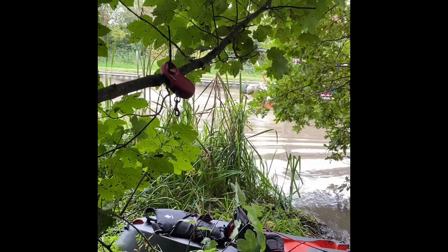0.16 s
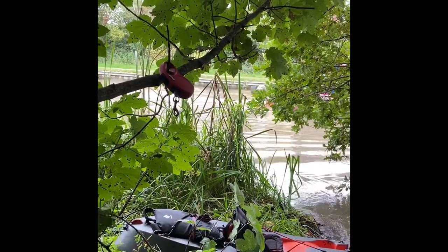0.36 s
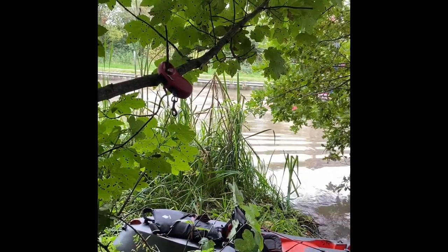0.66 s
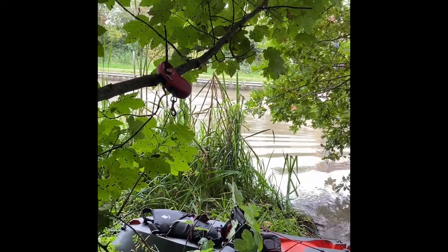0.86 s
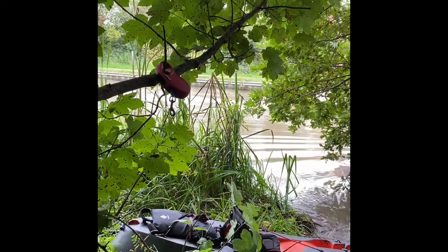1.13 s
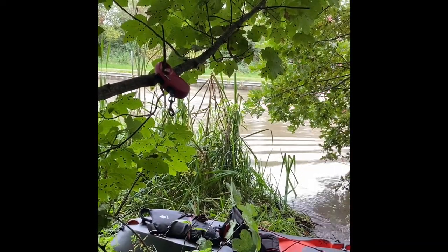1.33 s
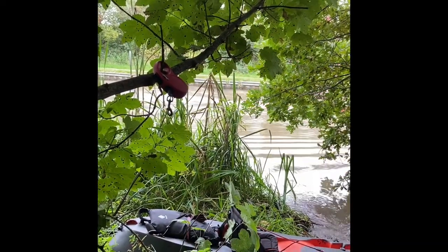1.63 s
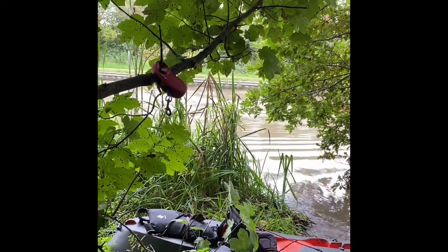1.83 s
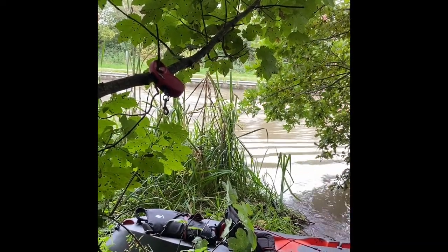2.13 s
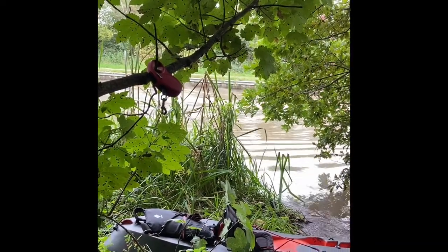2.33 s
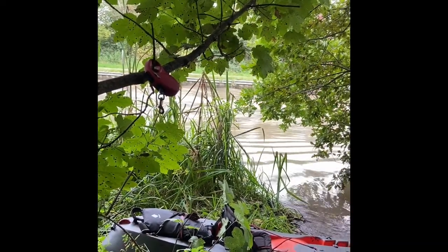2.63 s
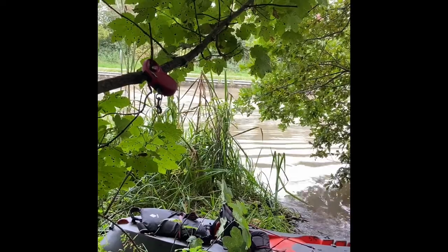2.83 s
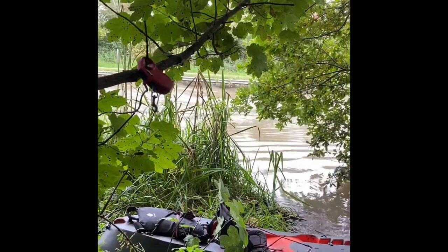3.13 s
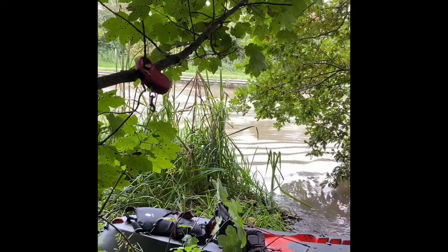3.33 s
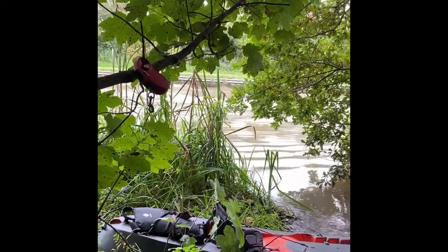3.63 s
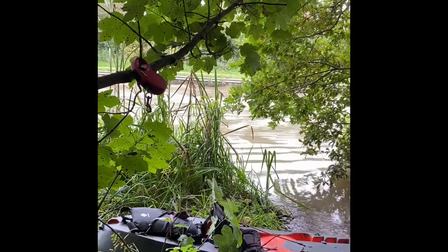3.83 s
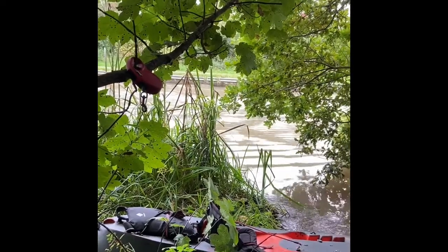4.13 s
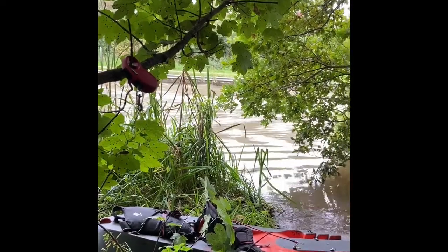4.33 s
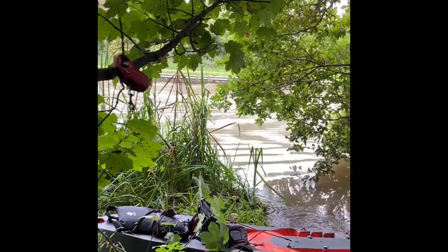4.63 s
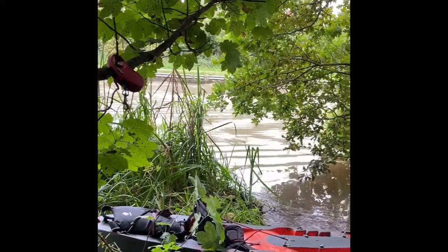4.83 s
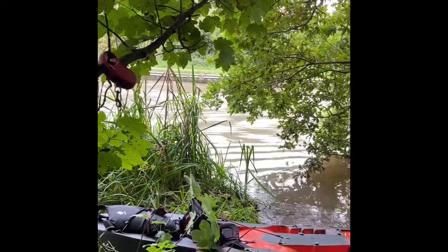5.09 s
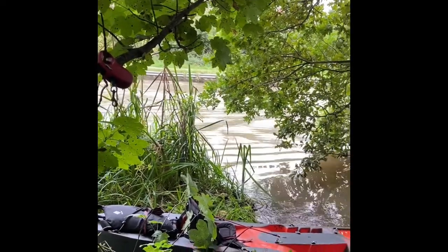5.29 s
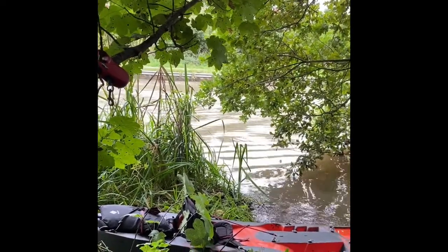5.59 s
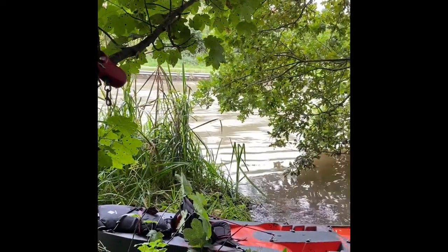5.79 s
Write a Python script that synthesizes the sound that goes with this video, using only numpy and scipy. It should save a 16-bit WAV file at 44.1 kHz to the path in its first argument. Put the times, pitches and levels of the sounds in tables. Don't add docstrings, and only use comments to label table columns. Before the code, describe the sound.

From a leafy canal bank, a slow diesel boat close by chugs in quick, uneven pairs of beats, between six and seven pairs a second. Each blow booms low, clangs hollowly and spits a short whistling hiss. It gradually gets quieter as it leaves. A thin bird chip sounds once near the start, over a soft watery hush. Stereo phone pickup.

```python
import sys
import numpy as np
from scipy import signal
from scipy.fft import rfft, irfft
from scipy.io import wavfile
from scipy.ndimage import uniform_filter1d, map_coordinates

SR = 44100
rng = np.random.default_rng(int(sys.argv[2]) if len(sys.argv) > 2 else 0)


def store_wav(level_fs):
    pcm = np.round(np.clip(np.atleast_2d(level_fs), -1, 1) * 32767)
    wavfile.write(sys.argv[1], SR, pcm.T.astype(np.int16))


def decibels_to_gain(level_db):
    exponent = np.asarray(level_db, float) / 20
    return 10 ** exponent


N = 262395
TIME = np.arange(N) / SR
FREQ = np.fft.rfftfreq(N, 1 / SR)

# (t/s, engine cycles done)
CRANK = [(-0.953, -7), (0.09, 0), (0.6862, 4), (1.5792, 10), (2.4716, 16), (3.3645, 22), (4.7052, 31),
         (5.0036, 33), (5.8974, 39)]
# (t/s, level against mid-way/dB)
NEAR = [
    (0, 2),
    (1, 1.63),
    (2, 1.56),
    (3, 0),
    (4.2, -1),
    (5, -1.5),
    (5.95, -3),
]


def boom():
    # (f/Hz, signed amplitude, time to fall 60 dB/s)
    pipe = [(46.9, 0.304, 0.546), (64.4, -0.609, 0.071), (87.0, -0.217, 0.147), (93.8, 0.417, 0.072),
            (129.3, -0.13, 0.134), (156.2, 0.153, 0.14), (191.2, 0.013, 0.458), (236.6, 0.01, 0.55),
            (301.3, -0.009, 0.211), (375.6, 0.015, 0.06)]
    # (f/Hz, signed amplitude, time to fall 60 dB/s)
    hull = [(47.8, 0.279, 0.55), (62.7, -0.156, 0.219), (73.8, -0.194, 0.145), (93.7, -0.032, 0.55),
            (120.4, -0.084, 0.365), (163.4, 0.515, 0.061), (174.2, -0.29, 0.121), (248.4, 0.023, 0.065),
            (253.9, -0.03, 0.313), (306.7, -0.006, 0.55)]
    cylinder_gap_s = .0372
    s, cycles = np.transpose(CRANK)
    starts = np.interp(np.arange(cycles[0], cycles[-1] + 1), cycles, s) + 1
    # under 60 Hz, 60-190 Hz, above
    fade = [share * curve(NEAR, 1) for share in (1, 0.26, 1)]
    out = np.zeros(N + SR)
    for modes, lag_s, second_share in ((pipe, .0146, .9495), (hull, .0237, .3123)):
        blows = np.zeros(N + 2 * SR)
        blows[((starts + lag_s) * SR).astype(int)] = 1
        blows[((starts + lag_s + cylinder_gap_s) * SR).astype(int)] = second_share
        for hz, gain, t60 in modes:
            db = fade[np.searchsorted([60, 190], hz)]
            level_db = np.pad(db, (SR, 0), "edge") - db[N // 2]
            out += gain * ring(blows[:N + SR], hz, t60) * decibels_to_gain(level_db)
    return signal.sosfilt(signal.butter(4, 35.7, "high", fs=SR, output="sos"), out)[SR:]


def strokes(lag_s, start_db, fall, high_column):
    # (t/s, low f/Hz, high f of first cylinder/Hz, high f of second cylinder/Hz)
    whistles = [(0, 1369, 2400, 2430), (1, 1310, 2300, 2300), (1.6, 1710, 2310, 2330),
                (2.6, 1530, 2400, 2550), (3.1, 1990, 2194, 2530), (3.7, 1867, 2580, 2600),
                (4.2, 1876, 2470, 2620), (4.7, 1800, 2140, 2320), (5.15, 2005, 2130, 2620),
                (5.45, 2132, 2190, 2520), (5.95, 2106, 2260, 2630)]
    # (t/s, then change of clang/dB, low whistle/dB, high whistle/dB)
    uneven = [(.099, 0.5, 2, -12), (.397, 3.7, -10, 0.5), (.434, 2.5, 0, 0), (.583, 5, -3, -0.5),
              (.695, 3.5, 0.5, 0), (.881, 4, -14, 3), (1.03, -6, 4, 3.5), (1.179, -18, -21, 3),
              (1.291, 0.5, 0, 1.5), (1.328, -7, -5, 0.5), (1.625, -25, -6, 1.5), (1.923, -3, 1, 3.5),
              (2.518, -1.5, 3, 4), (2.63, -0.5, -9, 2.5), (2.667, -2, -0.5, 1.5), (2.778, 0, -3, 5),
              (2.815, 4.5, 0, -2), (2.927, 0, 1.5, 2.5), (3.076, -0.5, 5, -4), (3.262, -38, 3, 2.5),
              (3.374, -1.5, -9, -1), (3.709, 1.5, 7, -1), (3.857, -1.5, 5, 0), (4.267, 0, 5.5, -15),
              (4.453, 0.5, 4.5, 2), (4.863, -2.5, -10, 0.5), (5.199, 4.5, -3, 0.3), (5.459, -2, 3, -1),
              (5.757, -1.5, -11, 0), (5.943, 2, 0, -1)]
    s, cycles = np.transpose(CRANK)
    times = np.interp(np.arange(-1, cycles[-1] + 1), cycles, s) + lag_s
    at = (times * SR).astype(int).clip(0)
    chance = rng.standard_normal((len(times), 5))
    db = np.array(start_db) + np.outer(curve(NEAR, 1)[at], fall)
    change_db = 1.5 * chance[:, :3]
    for when, *extra_db in uneven:
        change_db[np.abs(times - when) < .015] = extra_db
    clang, low, high = (db + change_db).T
    low_hz = curve(whistles, 1)[at] * (1 + .04 * chance[:, 3])
    high_hz = curve(whistles, high_column)[at] * (1 + .04 * chance[:, 4])
    return np.transpose([times, clang, low_hz, low, high_hz, high])


def puffs(events, knock, rise_s, hold_s, fall_s, clang_db, whistle_db, jet_db, whistle_t60, ragged_db,
          ping_db, rumble_db, lead_s, plate_db):
    # (f/Hz, level per Hz/dB)
    jet_colour = [(500, 1), (1000, 2.5), (2000, 3), (2800, 2), (3300, -4.5), (4200, -17), (5000, -11),
                  (5600, -14.5), (6500, -13.5), (8300, -18.5), (12000, -29.5), (15000, -39), (16500, -84)]
    # (f/Hz, time to fall 60 dB/s, share near, share far)
    outlet = [(536, 0.21, 0.058, 0.026), (703, 0.048, 0.86, 0.13), (767, 0.033, 0.57, 0.6),
              (870, 0.026, 0.066, 1), (1020, 0.018, 0.017, 0.47), (464, 0.095, 0.16, 0.13)]
    out, rumble = np.zeros(N), np.zeros(N)
    hiss = ragged(jet_colour, ragged_db)
    t = np.arange(SR // 12) / SR
    after = np.maximum(t - rise_s - hold_s, 0)
    shut = 0.43 * np.exp(-after / fall_s) + 0.84 * np.exp(-after / 0.018)
    gate = np.minimum(t / rise_s, 1) ** 2 * shut
    for s, db, low_hz, low_db, high_hz, high_db in events:
        gas = rng.standard_normal((5, len(t))) * gate
        far = s * SR / N
        push = 0.057 * gas[0]
        push[[0, int(SR / outlet[1][0])]] += knock
        clang = 0
        for hz, t60, near, away in outlet:
            clang = clang + (near + (away - near) * far) * ring(push, hz, t60)
        add(out, s, unit(clang) * decibels_to_gain(db + clang_db))
        for rush, hz, level_db in ((gas[1], low_hz, low_db), (gas[2], high_hz, high_db)):
            tone = np.cos(2 * np.pi * hz * t + rng.uniform(0, 2 * np.pi))
            drive = (rush + 0.37 * gate * tone) * gate
            add(out, s - lead_s, unit(ring(drive, hz, whistle_t60)) * decibels_to_gain(level_db + whistle_db))
        ping = unit(ring(gas[3], 5050 * (1 + .025 * gas[4, 200]), .012))
        add(out, s + 0.0016, ping * decibels_to_gain(high_db + ping_db - 8.1 * far))
        plate = unit(ring(gas[4] * gate, rng.uniform(2900, 4500), .012))
        add(out, s + 0.001015, plate * decibels_to_gain(db / 2 + plate_db))
        swell = (t / 0.011) * np.exp(1 - t / 0.0089)
        add(rumble, s + 0.017, swell * decibels_to_gain(rumble_db - 0.9 * far))
        i = max(int(s * SR), 0)
        jet = unit(gate[:N - i] * hiss[i:i + len(t)])
        add(out, s, jet * decibels_to_gain(0.61 * max(low_db, high_db) + jet_db - 1.17 * far))
    return band(out, 500, 22000) + rumble * unit(band(rng.standard_normal(N), 190, 412))


def ragged(points, depth_db):
    spectrum = rfft(coloured(points))
    octave = np.round(np.log2((FREQ + 1) / 700)).clip(0, 4)
    out = np.zeros(N)
    for k in range(5):
        spurts_db = depth_db * (1 - 0.13 * k) * walk(350)
        out += irfft(spectrum * (octave == k), N) * decibels_to_gain(spurts_db)
    return out


def water(x):
    # (t/s, first dip f/Hz, share)
    mirror = [(0, 1020, 0.25), (1.5, 1024, 0.26), (3, 1164, 0.078), (4.5, 1385, 0.06), (5.95, 1700, 0.1)]
    late = np.arange(N) - SR / curve(mirror, 1)
    return x - curve(mirror, 2) * map_coordinates(x, [late], order=3)


def trees(x, t60_low, t60_high):
    t = np.arange(SR) / SR
    noise = rng.standard_normal((2, SR)) * np.minimum(t / 0.0014, 1)
    low = signal.sosfilt(signal.butter(2, 1800, fs=SR, output="sos"), noise)
    tail = low * decibels_to_gain(-60 * t / t60_low) + (noise - low) * decibels_to_gain(-60 * t / t60_high)
    leaves = rng.standard_normal(SR) * decibels_to_gain(-60 * t / 0.025)
    side = 0.17 * band(tail[1], 590, 5600) + 5.4 * band(leaves, 1890, 5300)
    pair = spread(tail[0], side)
    return signal.fftconvolve(x[None], pair / np.sqrt(SR / 20), axes=1)[:, :N]


def bird():
    # (t/s, f/Hz, level/dB)
    chip = [
        (.718, 8330, -66),
        (.73, 8320, -51),
        (.745, 8260, -56),
        (.76, 8300, -47),
        (.778, 8250, -50),
        (.787, 8230, -58),
        (.84, 8260, -66),
    ]
    hz = curve(chip, 1) * (1 + 0.0046 * walk(260))
    sounding = (TIME > chip[0][0]) * (TIME < chip[-1][0])
    return np.sin(2 * np.pi * np.cumsum(hz) / SR) * decibels_to_gain(curve(chip, 2)) * sounding


def bank():
    # (f/Hz, level per Hz/dB)
    hush = [(90, -11), (150, -2), (290, -12), (520, -23), (750, -19.5), (1330, -19), (2460, -24.5),
            (3100, -30), (4500, -36), (5800, -38.5), (8000, -45.5), (12000, -49.5), (15000, -53),
            (16500, -99)]
    mid, side = water(coloured(hush)), coloured(hush)
    side = 0.75 * band(side, 416, 5100) + 1.4 * band(side, 2030, 5600)
    mid = mid / np.std(band(mid, 400, 16000))
    flicker_db = .7 * walk(15)
    return decibels_to_gain(-37.5 - 1.6 + 0.58 * curve(NEAR, 1) + flicker_db) * spread(mid, side)


def curve(table, column):
    return np.interp(TIME, [r[0] for r in table], [r[column] for r in table])


def unit(x):
    return x / np.sqrt(np.mean(x ** 2))


def on_log(points):
    hz, value = np.transpose(points)
    return np.interp(np.log(FREQ + 1), np.log(hz), value)


def coloured(points):
    return unit(irfft(rfft(rng.standard_normal(N)) * decibels_to_gain(on_log(points)), N))


def ring(x, hz, t60):
    pole = np.exp((2j * np.pi * hz - np.log(1000) / t60) / SR)
    return signal.lfilter([1], [1, -pole], x).imag


def walk(rate):
    k = int(SR / rate)
    held = np.repeat(rng.standard_normal(N // k + 1), k)
    return 1.3 * uniform_filter1d(uniform_filter1d(held, k), k)[:N]


def add(track, s, piece):
    i = int(s * SR)
    track[max(i, 0):i + len(piece)] += piece[max(-i, 0):max(N - i, 0)]


def band(x, lo_hz, hi_hz):
    return signal.sosfilt(signal.butter(3, [lo_hz, hi_hz], "band", fs=SR, output="sos"), x)


def spread(mid, side):
    side = signal.sosfilt(signal.ellip(8, .5, 70, 6600, fs=SR, output="sos"), side)
    return np.array([mid + side, mid - side])


def scene():
    first_strokes = strokes(.009, (-26.5, -29, -28.5), fall=(1.17, 1, 1), high_column=2)
    second_strokes = strokes(.046, (-29.5, -29, -27), fall=(0.97, 0.96, 1.2), high_column=3)
    first = puffs(first_strokes, knock=1.0, rise_s=0.00492, hold_s=0.0018, fall_s=0.009,
                  clang_db=-8, whistle_db=-13.5, jet_db=-23.0, whistle_t60=0.0094, ragged_db=1.5,
                  ping_db=-24.5, rumble_db=-36.5, lead_s=0.002512, plate_db=-38)
    second = puffs(second_strokes, knock=0.38, rise_s=0.002865, hold_s=0.00478, fall_s=0.0028,
                   clang_db=-5.5, whistle_db=-8.5, jet_db=-19, whistle_t60=0.0047, ragged_db=4.0,
                   ping_db=-17.0, rumble_db=-35.5, lead_s=0.000787, plate_db=-34.5)
    gas = water(first + second)
    scattered = decibels_to_gain(-12) * trees(gas, t60_low=0.28, t60_high=0.36)
    bird_pair = bird() * np.array([[1.9], [.95]])
    return boom() + gas + scattered + bank() + bird_pair


def top_cut(x):
    return signal.sosfilt(signal.butter(12, 15830, fs=SR, output="sos"), x)


def record(dry):
    # (f/Hz, phase by which left leads/rad)
    port_lead = [(0, 0), (200, -.03), (500, -.3), (950, -.55), (1250, 0), (1550, -.35), (2100, .2),
                 (2500, -.85), (3300, -1.1), (4700, 1), (6900, 2.3), (7800, 4), (11150, 7.1), (15100, 10.9)]
    # (f/Hz, left minus right level/dB)
    tilt = [(60, 0), (210, 0), (320, .5), (490, .86), (740, -3.1), (1130, -2.3), (1710, -1.), (4000, 0)]
    # (from f/Hz, to f/Hz, half turns)
    locked = [(6980, 7850, 1), (9750, 11100, 2), (12350, 14300, 3), (15300, 22050, 4)]
    lead = np.interp(FREQ, *np.transpose(port_lead))
    for lo_hz, hi_hz, half_turns in locked:
        lead[(FREQ > lo_hz) & (FREQ <= hi_hz)] = half_turns * np.pi
    half = decibels_to_gain(on_log(tilt) / 2) * np.exp(.5j * lead)
    low = signal.sosfiltfilt(signal.butter(2, 200, fs=SR, output="sos"), dry)
    pair = low + irfft(rfft(dry - low) * np.array([half, 1 / half]), N)
    pair = np.tanh(1.13 * pair) / 1.08
    pair = signal.sosfiltfilt(signal.ellip(8, .1, 50, 15800, fs=SR, output="sos"), pair)
    return top_cut(pair)


dry = scene()
out = record(dry)
store_wav(out)
```